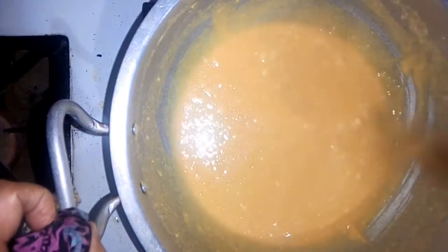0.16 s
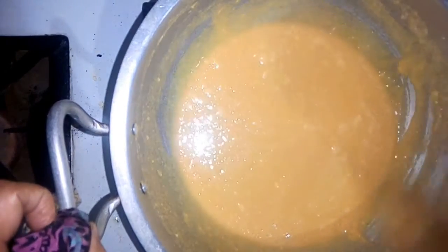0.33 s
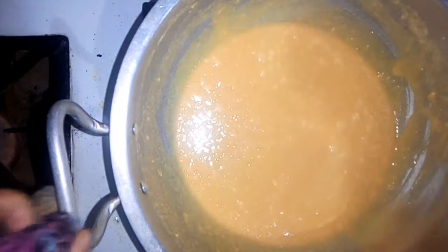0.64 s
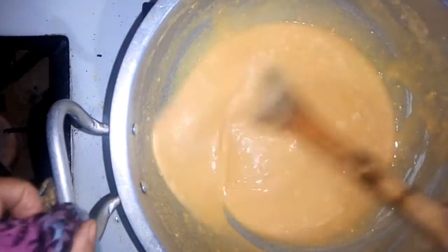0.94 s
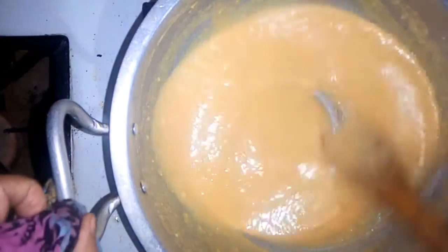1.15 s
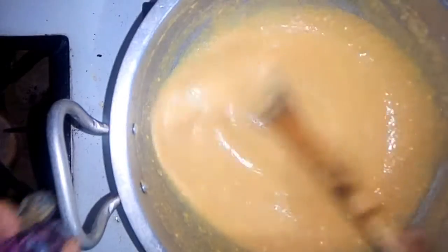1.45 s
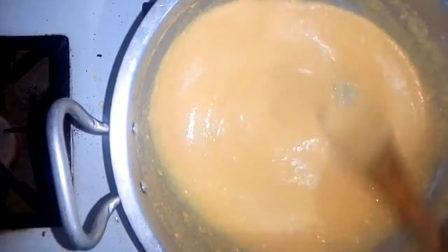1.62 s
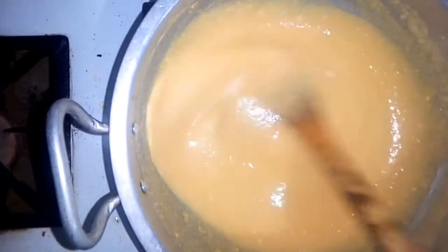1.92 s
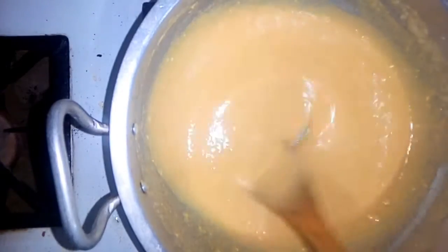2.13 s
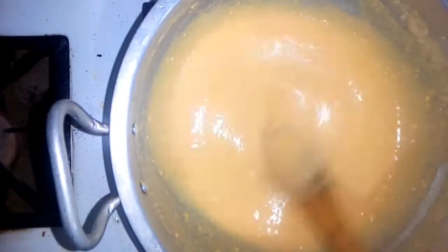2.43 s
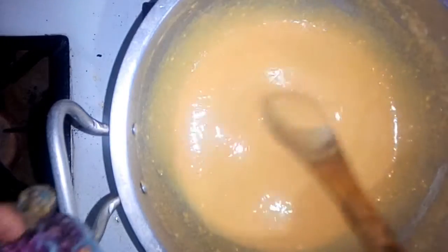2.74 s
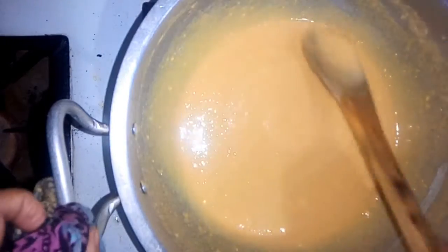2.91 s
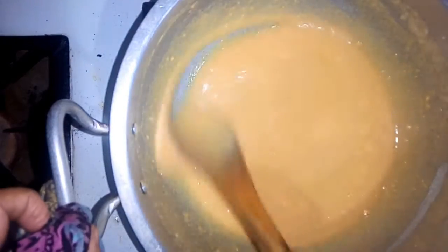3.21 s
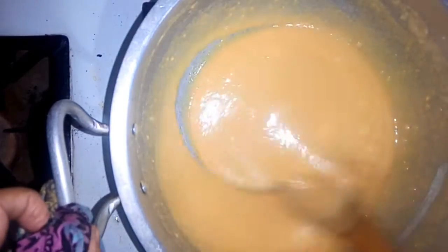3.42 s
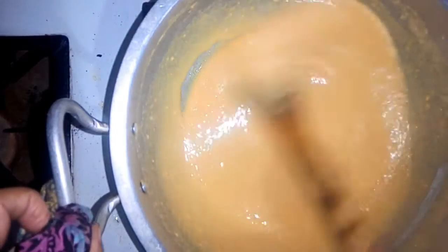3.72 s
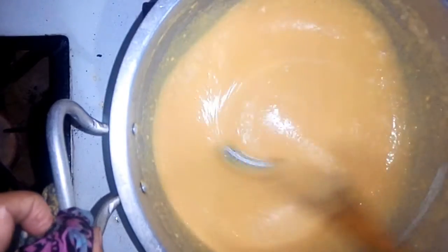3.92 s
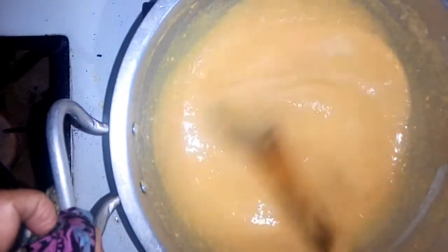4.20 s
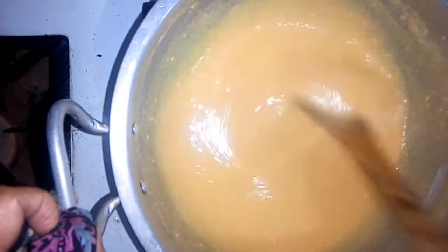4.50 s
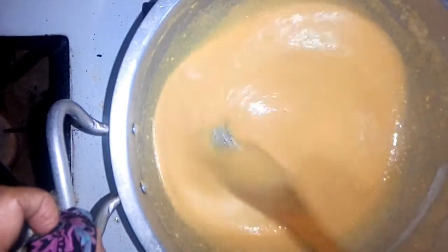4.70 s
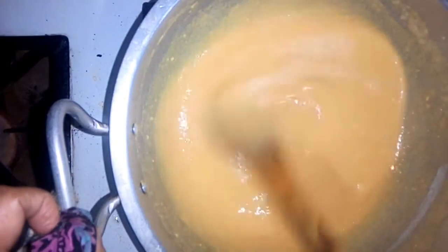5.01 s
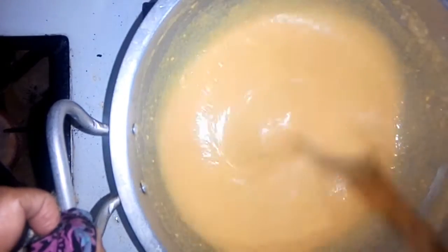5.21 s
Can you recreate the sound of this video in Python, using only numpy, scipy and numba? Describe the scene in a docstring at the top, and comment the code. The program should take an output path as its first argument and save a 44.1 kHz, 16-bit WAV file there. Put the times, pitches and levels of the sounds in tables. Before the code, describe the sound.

A close microphone hears a pot of thick hot paste in a small, quiet kitchen with a faint steady hiss. At the start a spoon brushes the pot with a soft tap and a wet rustle. At 0.3 and 0.6 seconds come two loud, hollow wooden knocks, each with a short blow and a faint metallic ring that fades into the room. Small crackles and light squelches follow. From about 1.1 seconds stirring builds: wet, jerky squelches, mostly sliding down in pitch, low heaving, fizzing crackle, clicky smacks and dull plops, fullest from 1.7 to 2.6, with a sharp pop near 2.4. It thins out by 2.8, leaving a near-silent simmer. At 3.1 a soft low thump begins a gentler bout, first sparse and sticky, with crackly smacks around 3.2 and 3.9. From 4.5 squelches become more frequent, with short wavering, throaty notes near 5, continuing to the end at about 5.4.

```python
"""Stirring a thick hot paste

A wooden spoon brushes a metal pot, knocks twice, then stirs, close up in a small kitchen: decaying modes ring the wall.
Random clicks through gliding resonators squelch as air pockets behind the spoon; low-coloured clicks heave the mass.
Swarms of damped sines crackle where paste meets hot metal; filtered puffs make gliding hisses, notes and faint hums.
Short rising sines are dull plops and the low thump of the spoon landing; a click and spatter smack as pockets burst."""
import sys
import numpy as np
from scipy import signal
from scipy.fft import rfft, irfft
from scipy.io import wavfile
from scipy.ndimage import uniform_filter1d
from numba import njit

SR = 44100
rng = np.random.default_rng(int(sys.argv[2]) if len(sys.argv) > 2 else 0)


def generate_wav(signal):
    """Clip the signal to [-1, 1] and save it as 16-bit WAV at the path in sys.argv[1]."""
    frames = np.transpose(np.atleast_2d(signal))
    scaled = np.clip(frames, -1, 1) * 32767
    pcm = np.round(scaled).astype(np.int16)
    wavfile.write(sys.argv[1], SR, pcm)


N = 235974
TIME = np.arange(N) / SR  # s


def undb(db):
    """Decibel law: level to amplitude gain."""
    return 10 ** (np.asarray(db) / 20)


def curves(table):
    """Linear interpolation in time of each level column; -120 dB before and after."""
    s, *columns = np.transpose(table)
    return [np.interp(TIME, s, c, left=-120, right=-120) for c in columns]


def add(track, s, sound):
    """Superposition: mix a sound into a track at time s."""
    i = int(s * SR)
    track[i:i + len(sound)] += sound[:N - i]


def together(gains):
    """Energy addition: joint gain of uncorrelated sounds."""
    return np.sqrt(sum(np.square(g) for g in gains))


def even(x):
    """Level normalisation: unit rms over every few hundredths of a second; the fine grain stays."""
    size = 1500
    power = uniform_filter1d(uniform_filter1d(x * x, size), size)
    return x / np.sqrt(np.abs(power) + 1e-18)


def walk(rate, size=N):
    """Random modulation: normal values, rate of them a second, joined by straight lines."""
    return 1.2 * np.interp(TIME[:size] * rate, np.arange(size), rng.standard_normal(size))


def swell(s, length, attack_s, release_s, sag_db):
    """Envelope: linear attack at time s, a hold that loses sag_db, exponential release."""
    age = np.maximum(TIME - s, 0)
    attack = np.minimum(age / attack_s, 1)
    hold = undb(-sag_db * np.minimum(age / length, 1))
    release = np.exp(-np.maximum(age - length, 0) / release_s)
    return attack * hold * release


def colour(x, points):
    """Minimum-phase filtering: the (f/Hz, level/dB) outline made causal by folding its cepstrum."""
    hz, db = np.transpose(points)
    size = 4096
    grid = np.maximum(np.fft.rfftfreq(size, 1 / SR), 1)
    cepstrum = irfft(np.log(undb(np.interp(np.log(grid), np.log(hz), db))))
    cepstrum[1:size // 2] *= 2
    cepstrum[size // 2 + 1:] = 0
    return signal.fftconvolve(x, irfft(np.exp(rfft(cepstrum))))[:len(x)]


@njit
def band_pass(x, hz, width):
    """State-variable resonance with gain 1 at its moving centre."""
    y, band, low = np.empty(len(x)), 0., 0.
    for i in range(len(x)):
        g = np.tan(np.pi * min(hz[i], .45 * SR) / SR)
        v = (band + g * (x[i] - low)) / (1 + g * (g + width[i]))
        band, low, y[i] = 2 * v - band, low + 2 * g * v, width[i] * v
    return y


def resonate(x, hz, width):
    """Resonance whose centre and width may move; width is a share of the centre."""
    return band_pass(x, hz * np.ones(len(x)), width * np.ones(len(x)))


def resonate_twice(x, hz, width):
    """Cascaded resonance: two equal band-passes give steeper skirts."""
    return resonate(resonate(x, hz, width), hz, width)


def clicks(rate, spread_db):
    """Random impulses at rate per s: many small and a few large, of either sign."""
    hit = rng.random(N) < rate / SR
    return hit * rng.choice([-1, 1], N) * undb(spread_db * np.minimum(rng.exponential(size=N), 5))


@njit
def bubbles(kicks, hz, cycles, rise):
    """Bubble resonance: each kick starts a damped sine that climbs as its bubble shrinks."""
    y = np.zeros(len(kicks))
    for i in range(len(kicks)):
        if kicks[i] != 0:
            n, phase = int(cycles * SR / hz[i]) + 2, 0.
            for j in range(min(n, len(y) - i)):
                phase += 2 * np.pi * hz[i] * (1 + rise * j / n) / SR
                y[i + j] += kicks[i] * np.exp(-5 * j / n) * np.sin(phase)
    return y


# spectrum of the quiet kitchen: (f/Hz, level/dB)
KITCHEN_COLOUR = [(25, 8), (60, -2), (110, 23), (300, 9.5), (1000, 4), (2500, 2), (4500, 6.5), (10000, 12),
                  (13000, -1.5), (16000, 8)]


def kitchen_quiet():
    """Steady broadband noise: random noise given a fixed spectrum."""
    return undb(-61.5) * even(colour(rng.standard_normal(N), KITCHEN_COLOUR))


def room(x, wet_db, t60_low, t60_high):
    """Reverberation: dense echoes of the kitchen walls decay exponentially, the treble sooner."""
    t = TIME[:SR]
    low = signal.sosfilt(signal.butter(2, 2500, fs=SR, output="sos"), rng.standard_normal(SR))
    high = signal.sosfilt(signal.butter(2, 2500, "high", fs=SR, output="sos"), rng.standard_normal(SR))
    tail = low * np.exp(-np.log(1000) * t / t60_low) + high * np.exp(-np.log(1000) * t / t60_high)
    tail *= np.clip((t - .003) / 0.0026, 0, 1)  # the first echoes arrive after 3 ms
    return undb(wet_db) * signal.fftconvolve(x, tail / np.sqrt(np.sum(tail ** 2)))[:N]


# resonances of the air in the open pot: (f/Hz, width as a share of f, level/dB)
POT_AIR_MODES = [(285, .08, -10), (403, .03, -11), (497, .025, -4), (625, .03, -8), (795, .03, -8),
                 (1070, .08, -9), (1430, .02, -11), (2125, .015, -6), (4645, .02, -5), (6550, .04, -7)]


def in_pot(x):
    """Cavity resonance: the air in the open pot rings along with the paste."""
    air = sum(undb(db) * resonate(x, hz, width) for hz, width, db in POT_AIR_MODES)
    return undb(-0.5) * (x + air)


# spectrum of the jolt of the hob under the pot: (f/Hz, level/dB)
THUD_COLOUR = [(50, -16), (95, 8), (170, 6.5), (260, 0), (350, -2.5), (480, -36), (1000, -40.5)]


def hob_thud():
    """Damped low-frequency vibration: coloured noise dies away as the hob jolts."""
    return even(colour(rng.standard_normal(SR), THUD_COLOUR)) * np.exp(-TIME[:SR] / 0.15)


# spectrum of the spoon's first touch on the wall: (f/Hz, level/dB)
TICK_COLOUR = [(300, -24), (2000, 1), (5000, -9), (10000, 1.5), (13000, -2.5), (15500, -3)]


def wood_tick():
    """Contact impulse: a noise burst that decays within a few milliseconds."""
    return colour(rng.standard_normal(SR) * np.exp(-TIME[:SR] / 0.00062), TICK_COLOUR)


# spectrum of the wooden crack: (f/Hz, level/dB)
CRACK_COLOUR = [(40, -35), (150, -30), (400, -13), (650, 15.5), (1000, 4.5), (1400, 8), (2000, 8.5),
                (2500, -0.5), (3200, -2), (9000, -4), (13000, -15), (15500, -8)]


def wood_crack():
    """Impact noise: a burst with an exponential decay of some milliseconds."""
    return colour(rng.standard_normal(SR) * np.exp(-TIME[:SR] / 0.0056), CRACK_COLOUR)


# modes of the pot; the paste damps some at once:
# (f/Hz, level/dB struck at place 0, level/dB struck at place 1, t60/s)
POT_MODES = [(92.5, -33.5, -32, 0.32), (123, -36, -29, 0.83), (243, -11, -5, 0.043),
             (280, -16.5, -34.5, 0.41), (300, -16, -7, 0.063), (328.5, -30.5, -24.5, 0.76),
             (455, -29.5, -45.5, .35), (537, -15.5, -22, 0.028), (604, -13, -16.5, 0.27),
             (634, 0, 2.5, 0.017), (677, -22, -27, 0.48), (744, 8.5, 3.5, 0.017), (835, -31, -38, .39),
             (915, -34, -23, 0.25), (1096, -29.5, -23, 0.51), (1155, -11, -18, 0.44),
             (1138, -3.5, -13.5, 0.055), (1340, -5, -21, 0.025), (1710, -19.5, -12.5, 0.45),
             (1764, -19.5, -27.5, 0.41), (1720, -4, -7, 0.024), (2070, -33, -33, 0.68),
             (2280, -25, -24.5, 0.42), (3200, -41, -31, 0.29), (3133, -7.5, -15, 0.031),
             (4690, -15, -7, 0.021)]
WOBBLE_SHARE, WOBBLE_DB, WOBBLE_RATE = 0.0048, 0.5, 59  # of pitch; of level, dB; changes per s


def pot_ring(place):
    """Modal synthesis: the strike's place weights the modes; shaken paste loads the wall unevenly."""
    hz, first_db, second_db, t60 = np.transpose(POT_MODES)[:, :, None]
    damped = t60[:, 0] < .1
    sign = (-1) ** np.arange(len(POT_MODES))[:, None]
    gain = sign * undb(first_db + np.clip(place, 0, 1) * (second_db - first_db))
    load = np.array([walk(WOBBLE_RATE, size=SR) for _ in POT_MODES])
    phase = 2 * np.pi * np.cumsum(hz * (1 - WOBBLE_SHARE * load), axis=1) / SR
    modes = gain * np.sin(phase) * np.exp(-np.log(1000) * TIME[:SR] / t60)
    short = modes[damped].sum(axis=0)
    lasting = (modes * undb(-WOBBLE_DB * load))[~damped].sum(axis=0)
    return short, lasting


# spoon on the pot: (t/s, level/dB, place on the wall 0-1,
# wooden crack level/dB and hob thud level/dB, both relative to the knock)
KNOCK_EVENTS = [(0.057, -43, 1, -5, -18), (0.3135, -18, 0.0, -2.5, -30.5), (0.6155, -16, 0.8, -2, -28.5)]
TICK_DB, CONTACT_S = -5.5, .0007  # tick relative to crack; the full weight follows one contact time later


def knocks():
    """Impact excitation: tick, crack, wall modes and thud; mostly the short blow fills the kitchen."""
    direct, sent = np.zeros(N), np.zeros(N)
    for s, db, place, crack_db, thud_db in KNOCK_EVENTS:
        short, lasting = pot_ring(place)
        # the paste on the spoon softens the blow
        soft_onset = 1 - np.exp(-TIME[:SR] / 0.00096)
        blow = undb(db) * (undb(crack_db) * wood_crack() + short) * soft_onset
        ring = undb(db) * lasting
        thud = undb(db + thud_db) * hob_thud()
        add(direct, s, undb(db + crack_db + TICK_DB) * wood_tick())
        add(direct, s + CONTACT_S, blow + ring + thud)
        add(sent, s + CONTACT_S, blow + 0.4 * ring)
    return direct + room(sent, wet_db=-7.5, t60_low=0.54, t60_high=0.48)


# dull plops of large pockets, and a low thump as the spoon lands in the paste:
# (t/s, level/dB before the envelope, starting f/Hz, decay time/s)
PLOP_AND_THUMP_EVENTS = [(1.019, -24.5, 600, 0.0015), (1.404, -28, 760, 0.0048), (1.795, -29.5, 375, 0.01),
                         (2.049, -11.5, 620, 0.0021), (2.124, -26.5, 623, 0.01), (2.208, -22, 855, 0.0018),
                         (2.351, -42, 745, 0.0039), (2.373, -8, 830, 0.0015), (2.47, -32, 398, 0.0073),
                         (3.132, -48, 140, 0.01), (3.309, -29, 517, 0.0032), (3.517, -31.5, 393, 0.0064),
                         (3.815, -33.5, 302, 0.0079), (3.838, -39, 197, .014), (3.84, -21.5, 735, 0.0021),
                         (4.074, -35, 107, 0.013), (4.68, -34, 614, 0.0024), (4.8, -27.5, 500, 0.0063),
                         (5.191, -24.5, 497, 0.0046)]


def plops_and_thump():
    """Damped oscillation: each plop, and the thump, is a dull decaying sine that rises a little."""
    out, t = np.zeros(N), TIME[:SR // 8]
    for s, db, hz, decay in PLOP_AND_THUMP_EVENTS:
        shape = (1 - np.exp(-t / 0.0031)) * np.exp(-t / decay)
        add(out, s, undb(db) * shape * np.sin(2 * np.pi * hz * t * (1 + 0.34 * t)))
    return out


# pockets that burst: (t/s, peak level/dB before a common 1.5 dB lift, band centre f/Hz, spatter decay time/s)
SMACK_EVENTS = [(0.784, -35, 5840, 0.0081), (1.0196, -35.5, 7500, 0.0026), (1.134, -43, 6500, 0.0015),
                (1.1723, -24.5, 4700, 0.0071), (1.183, -28, 4930, .003), (1.197, -30.5, 6000, 0.0094),
                (1.288, -31.5, 4500, 0.0022), (1.352, -30, 5540, 0.0015), (1.5434, -22, 5260, 0.0014),
                (1.566, -29, 5340, 0.0032), (1.734, -31, 4800, 0.0018), (1.764, -25, 4430, 0.007),
                (1.978, -30, 5140, 0.0059), (2.049, -23.5, 4370, 0.0033), (2.124, -32, 4500, .005),
                (2.2068, -29, 1890, 0.0058), (2.2255, -29, 3930, 0.0033), (2.356, -29, 4400, 0.0025),
                (2.3735, -13, 4600, 0.0014), (2.4052, -27, 4140, 0.0043), (2.5303, -34, 3020, .0025),
                (2.5435, -28.5, 2840, 0.005), (2.574, -31, 2500, 0.0044), (2.6082, -32, 1800, 0.0017),
                (2.63, -29, 3000, 0.0032), (2.99, -42.5, 7500, 0.002), (3.139, -36.5, 4900, 0.004),
                (3.174, -35, 5530, 0.0078), (3.2111, -27, 3500, 0.0037), (3.22, -30.5, 3770, .007),
                (3.8402, -26.5, 4500, 0.0015), (3.8995, -32, 5430, 0.0038), (3.993, -42, 1500, 0.0018),
                (3.9982, -31, 5300, 0.0024), (4.3584, -32, 4000, 0.0026), (4.386, -33, 5040, 0.0076),
                (4.557, -37, 1500, 0.0014), (4.754, -25.5, 3570, 0.0063), (5.1027, -32, 4140, 0.012)]


def smacks():
    """Impulsive rupture: a skin of paste snaps open with one sharp click, then a very short spatter."""
    out, t = np.zeros(N), TIME[:SR // 10]
    for s, db, hz, decay in SMACK_EVENTS:
        snap = 0.35 * rng.standard_normal(len(t)) * np.exp(-t / decay)
        snap[0] += 1
        snap = resonate(snap, hz, 0.92)
        snap = colour(snap, [(6500, 8.0), (7800, 0.5), (9500, 6.5), (13000, -6), (15500, 11.0)])
        add(out, s, undb(db + 1.5) * snap / np.abs(snap).max())
    return out


# gliding hisses and notes of air in wet paste, and faint hums of the pot after the knocks:
# (t/s, length/s, first f/Hz and last f/Hz before the waver, level/dB)
GLIDE_EVENTS = [(0.387, 0.18, 4650, 4400, -57.5), (0.65, 0.19, 2840, 2900, -53.5),
                (1.384, 0.047, 2100, 1990, -50.5), (1.76, 0.052, 1790, 1730, -51.5),
                (1.942, 0.21, 5030, 4500, -44.5), (2.09, 0.099, 4570, 4350, -45),
                (2.111, 0.019, 660, 620, -46), (2.282, 0.072, 2050, 1960, -41),
                (2.55, 0.071, 1740, 1510, -48.5), (2.709, 0.047, 1270, 1000, -52),
                (3.296, 0.24, 3870, 3400, -55), (3.663, 0.085, 960, 1130, -55),
                (3.665, 0.077, 1930, 2070, -57), (3.973, 0.043, 1230, 1450, -49.5),
                (4.131, 0.039, 2150, 1980, -54), (4.136, 0.057, 1020, 1050, -53),
                (4.217, 0.057, 1040, 1090, -49), (4.431, 0.063, 480, 460, -49.5),
                (4.483, 0.11, 1030, 1140, -50), (4.545, 0.033, 3000, 3000, -49),
                (4.61, 0.053, 880, 1110, -45.5), (4.79, 0.055, 1360, 1480, -51),
                (4.974, 0.038, 780, 762, -45), (5.015, 0.032, 1080, 1110, -47),
                (5.037, 0.046, 787, 710, -44.5), (5.082, 0.037, 774, 755, -48),
                (5.145, 0.053, 720, 487, -46.5), (5.266, 0.074, 2300, 2190, -50.5)]
FLUTTER_DB, NOTE_WIDTH = 1.5, .125  # unevenness of the puffs; note width as a share of its pitch
# broad spitting around the note: the higher the note, the more it spits
SPIT_DB, SPIT_DB_PER_OCTAVE, SPIT_FROM_HZ = -12.5, 7.5, 1000


def gliding_notes():
    """Noise-excited resonance: uneven puffs through gliding band-passes give short, wavering notes and hisses."""
    out = np.zeros(N)
    puffs = clicks(2500, 2.7) * undb(FLUTTER_DB * walk(110))
    waver = np.exp(.015 * walk(70))
    for s, length, first_hz, last_hz, db in GLIDE_EVENTS:
        u = (TIME - s) / length
        on = (u > 0) & (u < 1)
        hz = first_hz * (last_hz / first_hz) ** u[on] * waver[on]
        note = resonate_twice(puffs[on], hz, NOTE_WIDTH)
        spit = resonate_twice(puffs[on], hz, .7)
        spit_db = SPIT_DB + SPIT_DB_PER_OCTAVE * np.log2(first_hz / SPIT_FROM_HZ)
        sound = note / note.std() + undb(spit_db) * spit / spit.std()
        sound *= np.sin(np.pi * u[on]) ** 0.4
        out[on] += undb(db) * sound / sound.std()
    return out


# paste lands on bare hot metal and flares up: (t/s, length/s, crackle level/dB, finest spray level/dB)
FLURRY_EVENTS = [(0.0, 0.041, -50.5, -54), (0.035, 0.044, -47.5, -52), (0.345, 0.082, -45.5, -53),
                 (0.45, 0.16, -55, -77), (0.634, 0.065, -44.5, -53), (0.727, 0.1, -52.5, -56.5),
                 (0.851, 0.019, -46, -52), (0.923, 0.055, -53, -58), (1.106, 0.094, -46.5, -50),
                 (1.23, 0.11, -48, -62), (1.51, 0.17, -47, -59), (1.697, 0.028, -41.5, -54),
                 (2.01, 0.22, -49.5, -57), (2.22, 0.054, -63, -53), (2.35, 0.03, -44, -67),
                 (2.526, 0.015, -38.5, -44.5), (2.615, 0.1, -50.5, -57.5), (2.837, 0.067, -63, -61),
                 (3.101, .04, -59, -61), (3.14, 0.12, -46.5, -53), (3.277, 0.29, -58, -78),
                 (3.528, 0.071, -53, -57.5), (3.684, 0.12, -58.5, -89), (3.793, 0.037, -57, -62),
                 (3.876, 0.027, -47.5, -47.5), (3.942, 0.13, -50.5, -56), (4.203, 0.065, -56, -52.5),
                 (4.295, 0.023, -52, -50), (4.35, 0.037, -49.5, -51.5), (4.524, 0.017, -60, -72),
                 (4.613, 0.064, -49, -65), (4.761, 0.078, -51, -51.5), (4.989, 0.11, -49.5, -67),
                 (5.129, 0.13, -48, -54.5)]
FLURRY_ATTACK_S, FLURRY_RELEASE_S, FLURRY_SAG_DB = 0.021, 0.033, -1  # negative sag: grows while held
SIMMER_DB, SIMMER_SPRAY_DB = -65, -71  # crackle and spray of the pot left alone
# offsets from the effort of the drag; the spray grows by a share of each dB of effort
DRAG_CRACKLE_DB, DRAG_SPRAY_DB, SPRAY_GROWTH = -7.5, -32.5, 0.56


def heat(effort_db):
    """Energy sum of boiling: gains of crackle and spray from a simmer, the spoon's drag and flurries."""
    crackle = [undb(SIMMER_DB), undb(effort_db + DRAG_CRACKLE_DB)]
    spray = [undb(SIMMER_SPRAY_DB), undb(SPRAY_GROWTH * effort_db + DRAG_SPRAY_DB)]
    for s, length, crackle_db, spray_db in FLURRY_EVENTS:
        flare = swell(s, length, FLURRY_ATTACK_S, FLURRY_RELEASE_S, FLURRY_SAG_DB)
        crackle.append(undb(crackle_db) * flare)
        spray.append(undb(spray_db) * flare)
    return together(crackle), together(spray)


def fizz(rate, spread_db, low_hz, high_hz, cycles):
    """Bubble swarm: small resonant bubbles start at pitches between low and high."""
    hz = low_hz * (high_hz / low_hz) ** rng.random(N)
    return bubbles(clicks(rate, spread_db) * hz / high_hz, hz, cycles, 0.072)


def films(lowest_hz, step, width, count):
    """Membrane resonance: thin films of paste, ripped by the spoon, ring at sliding pitches as they stretch."""
    rips = clicks(2400, 1.8)
    total = np.zeros(N)
    for k in range(count):
        hz = lowest_hz * step ** k * np.exp(0.1064 * walk(20))
        total += even(resonate(rips, hz, width)) * undb(3.5 * walk(25))
    return even(total)


# spectra of the crackle, wet tearing, finest spray and single coarse bubbles: (f/Hz, level/dB)
CRACKLE_COLOUR = [(1200, -16.5), (2500, -3.5), (3400, -2), (4600, 1.5), (6500, 1.5), (7600, -5),
                  (10000, -29.5)]
TEARING_COLOUR = [(600, -6), (1300, -1), (2100, -1), (2900, -0.5), (4000, -3), (8000, -72)]
SPRAY_COLOUR = [(5000, -46), (7800, 1.5), (9500, 8), (11000, -1.5), (13700, -2.5), (14900, 12), (16000, -9)]
GRIT_COLOUR = [(500, -22), (1500, -10.5), (3000, -2), (6500, 2), (8000, -7), (10000, -1), (13000, -10),
               (15500, 2)]
TEARING_DB, TEARING_SHARE = -6.5, 0.7  # tearing lies between squelch (this share) and crackle
GRIT_PER_S, GRIT_DB = 60, 14  # coarse bubbles; their size above the crackle


def sizzle(effort_db, wet_gain):
    """Vapour-bubble noise: steam breaks in flurries where paste meets hot metal, from coarse to fine."""
    crackle_gain, spray_gain = heat(effort_db)
    between = wet_gain ** TEARING_SHARE * crackle_gain ** (1 - TEARING_SHARE)
    tearing_gain = together([undb(TEARING_DB) * between, undb(-8.5) * crackle_gain])
    snaps = even(even(clicks(5000, 1.7)) + 0.5 * even(clicks(200, 3.0)))

    crackle = even(fizz(1500, 2.6, 2600, 8000, cycles=50))
    crackle += .65 * films(3300, 1.2, .035, count=5) + .9 * snaps
    tearing = .7 * even(fizz(1200, 2.2, 1100, 3600, cycles=20))
    tearing += films(1450, 1.42, .045, count=3) + .7 * snaps
    spray = even(fizz(2000, 0.6, 7650, 11700, cycles=19)) + snaps
    grit = undb(GRIT_DB) * colour(clicks(GRIT_PER_S, 2.0), GRIT_COLOUR)

    return (grit * crackle_gain
            + even(colour(crackle * undb(0.55 * walk(110)), CRACKLE_COLOUR)) * crackle_gain
            + even(colour(tearing * undb(1.1 * walk(90)), TEARING_COLOUR)) * tearing_gain
            + even(colour(spray * undb(2.0 * walk(120)), SPRAY_COLOUR)) * spray_gain)


# two bouts of steady drag: (t/s, effort as squelch level/dB, heave level/dB), before the offsets below
STIRRING_BOUTS = [
    [(1.07, -54.5, -74), (1.192, -46.5, -88), (1.832, -38, -46), (1.892, -44, -45.5), (2.12, -43.5, -62),
     (2.204, -38, -52.5), (2.482, -42, -46.5), (2.726, -48.5, -66), (2.76, -65, -69), (2.85, -73, -78)],
    [(3.11, -76, -64), (3.21, -49, -77), (3.55, -49.5, -63), (3.66, -50, -66), (3.8, -48.5, -59.5),
     (4.2, -46.5, -50), (4.42, -44.5, -75), (4.55, -45, -58), (4.73, -48, -65), (4.89, -43.5, -89),
     (4.95, -51.5, -81), (5.03, -43, -75), (5.35, -43.5, -56.5)],
]
DRAG_DB, HEAVE_DB, DRAG_HZ = -8, -1, 598  # offsets of squelch and heave; mean pocket pitch of the drag
# pushes of the spoon; the air pocket behind it mostly falls in pitch:
# (t/s, length/s, first f/Hz, last f/Hz, squelch level/dB)
PUSHES = [(0.0, 0.071, 478, 248, -48.5), (0.859, 0.024, 680, 890, -49), (0.919, 0.048, 910, 810, -51),
          (1.217, 0.089, 474, 382, -49.5), (1.381, 0.077, 870, 780, -50.5), (1.536, 0.11, 634, 484, -44.5),
          (1.689, 0.17, 660, 345, -40.5), (1.857, 0.2, 830, 855, -46), (2.016, 0.19, 807, 626, -41),
          (2.167, 0.13, 590, 524, -44), (2.266, 0.13, 970, 930, -40), (2.449, 0.03, 444, 340, -39),
          (2.537, 0.066, 770, 640, -46), (2.615, 0.067, 630, 460, -47.5), (3.143, 0.3, 813, 534, -50),
          (3.413, 0.32, 430, 383, -54), (3.8, 0.099, 302, 550, -47.5), (3.952, 0.068, 674, 390, -48),
          (4.112, 0.052, 1060, 1070, -46.5), (4.226, 0.092, 1050, 1200, -55.5),
          (4.521, 0.044, 910, 860, -41.5), (4.599, 0.042, 830, 935, -46.5), (4.672, 0.024, 620, 490, -48.5),
          (4.815, 0.16, 475, 318, -50.5), (4.964, 0.081, 1050, 920, -48), (5.079, 0.21, 805, 480, -50.5)]
PUSH_ATTACK_S, PUSH_RELEASE_S, PUSH_SAG_DB = 0.021, 0.023, 1.5  # each push eases off by the sag
PUSH_HEAVE_DB = -22.5  # heave of the mass relative to the pushes


def spoon():
    """Energy-weighted mean: drag and pushes add in power; the strongest pulls the pocket's pitch most."""
    effort_db, heave_db = np.max([curves(bout) for bout in STIRRING_BOUTS], axis=0)
    drag = undb(effort_db + DRAG_DB)
    pushes, weighted_hz = [], DRAG_HZ * drag ** 2
    for s, length, first_hz, last_hz, db in PUSHES:
        push = undb(db) * swell(s, length, PUSH_ATTACK_S, PUSH_RELEASE_S, PUSH_SAG_DB)
        glide = first_hz * (last_hz / first_hz) ** np.clip((TIME - s) / length, 0, 1)
        pushes.append(push)
        weighted_hz = weighted_hz + glide * push ** 2
    wet_gain = together([drag] + pushes)
    hz = weighted_hz / wet_gain ** 2
    heave_gain = together([undb(heave_db + HEAVE_DB), undb(PUSH_HEAVE_DB) * together(pushes)])
    return effort_db, hz, wet_gain, heave_gain


# spectrum of the heaving mass: (f/Hz, level/dB)
HEAVE_COLOUR = [(25, -14), (55, -8), (88, 6), (120, 3), (160, -12), (225, 1), (330, -8), (700, -32)]
POCKET_WIDTH_HZ = 710  # the pocket rings more sharply as it gets smaller and higher


def squelch(hz, wet_gain, heave_gain):
    """Stick-slip excitation: paste tears in jerks and rings the changing air pocket; the mass heaves below."""
    jerks = clicks(1800, 4.2) * undb(3.7 * walk(55))
    hz = hz * np.exp(0.08 * walk(45))
    pocket = resonate_twice(jerks, hz, POCKET_WIDTH_HZ / hz)
    overtone = resonate_twice(jerks, 2.1 * hz, .17)
    # smaller pockets pinch off around the large one
    scatter = np.exp(.42 * np.clip(rng.standard_normal(N), -1.8, 2))
    small_pockets = bubbles(clicks(650, 3.0), hz * scatter, 19., .4)
    wet = even(even(pocket) + undb(-7.5) * even(overtone) + undb(0.5) * even(small_pockets))
    heave = even(colour(clicks(780, 0.87), HEAVE_COLOUR))
    return wet * wet_gain + heave * heave_gain


def scene():
    """Superposition: the paste sounds straight up at the microphone, with only a little of the room."""
    effort_db, hz, wet_gain, heave_gain = spoon()
    stirred = in_pot(squelch(hz, wet_gain, heave_gain) + sizzle(effort_db, wet_gain))
    close_sounds = stirred + gliding_notes() + smacks() + plops_and_thump()
    echoes = room(close_sounds, wet_db=-11, t60_low=0.25, t60_high=0.15)
    return (kitchen_quiet() + knocks() + echoes + close_sounds)[None]


TOP_HZ = 15900


def record(dry):
    """Band limitation: the small microphone loses the deepest bass; the recorder cuts the top."""
    thin = signal.sosfilt(signal.butter(2, 55, "high", fs=SR, output="sos"), dry)
    return signal.sosfilt(signal.ellip(10, .2, 70, TOP_HZ, fs=SR, output="sos"), thin)


dry = scene()
out = record(dry)
generate_wav(out)
```